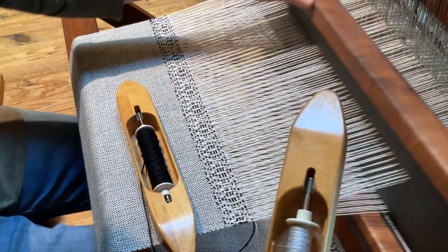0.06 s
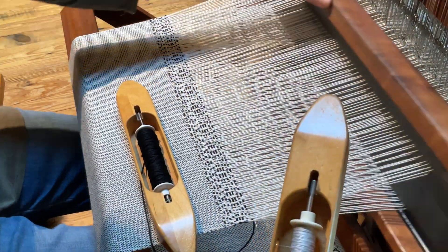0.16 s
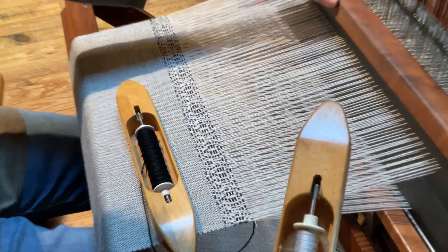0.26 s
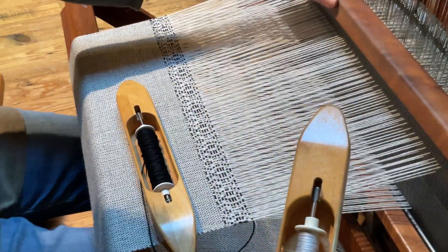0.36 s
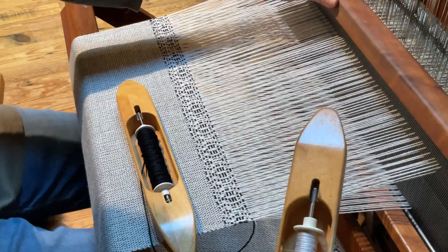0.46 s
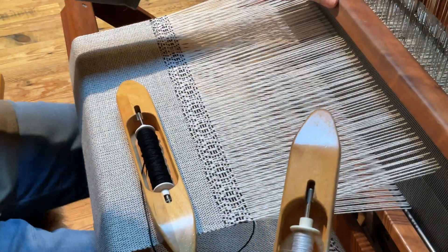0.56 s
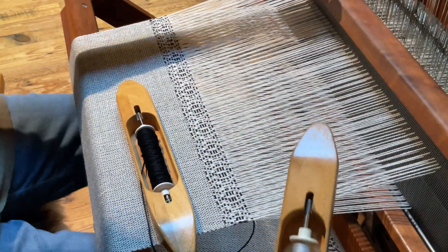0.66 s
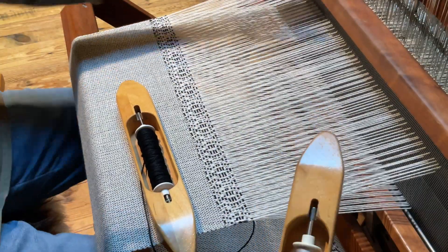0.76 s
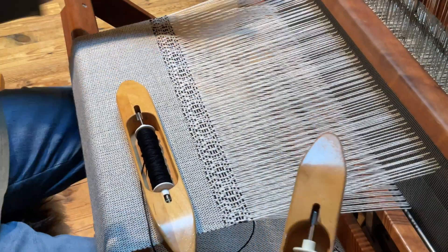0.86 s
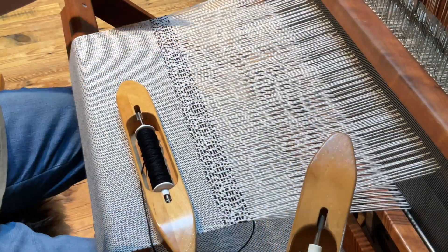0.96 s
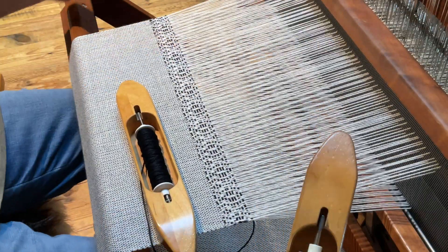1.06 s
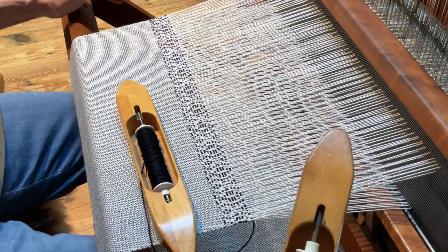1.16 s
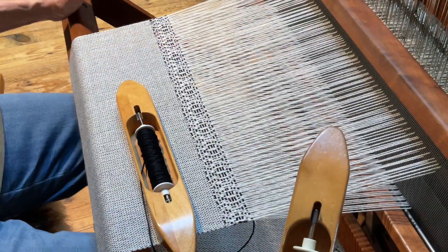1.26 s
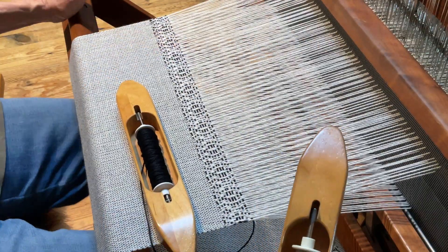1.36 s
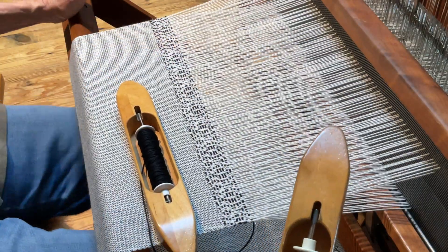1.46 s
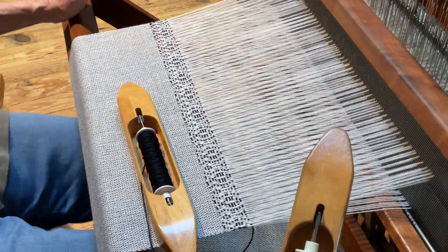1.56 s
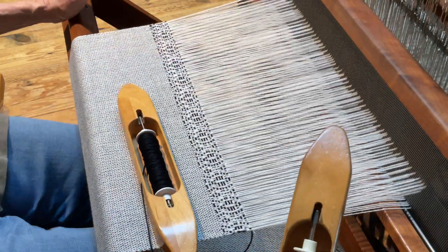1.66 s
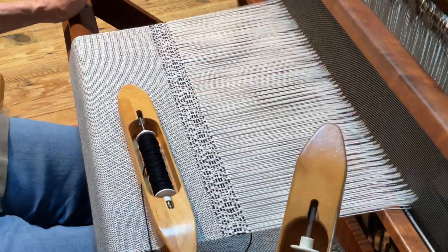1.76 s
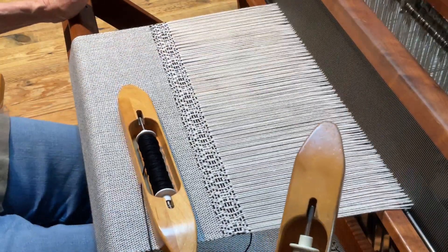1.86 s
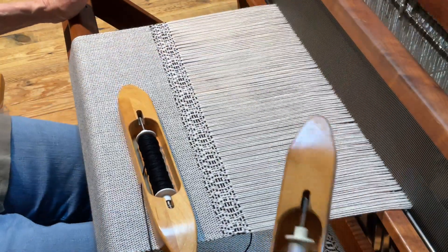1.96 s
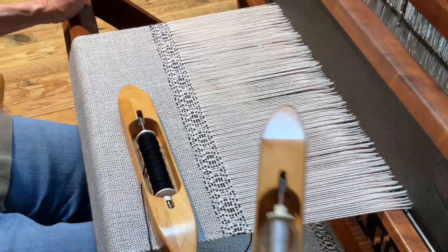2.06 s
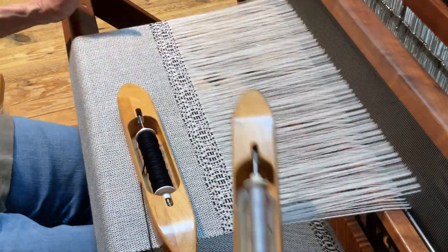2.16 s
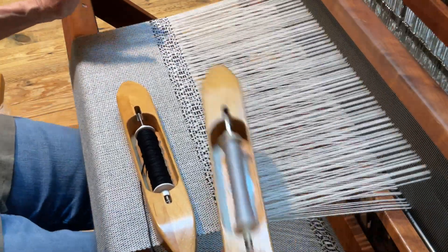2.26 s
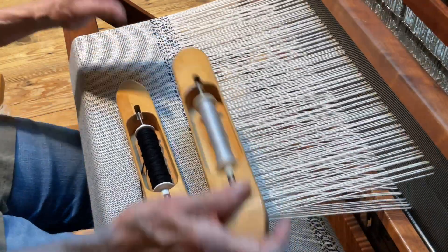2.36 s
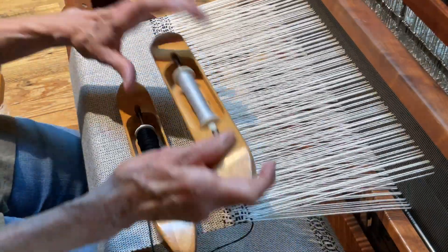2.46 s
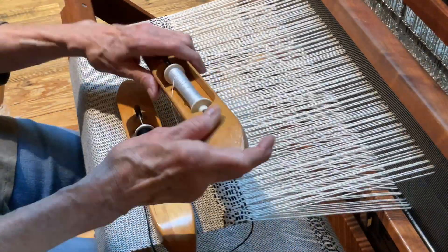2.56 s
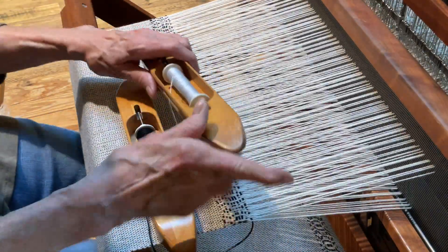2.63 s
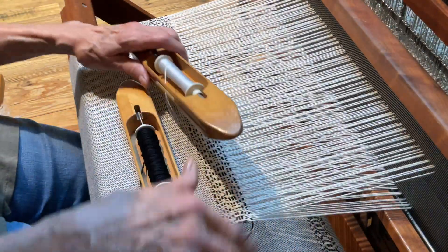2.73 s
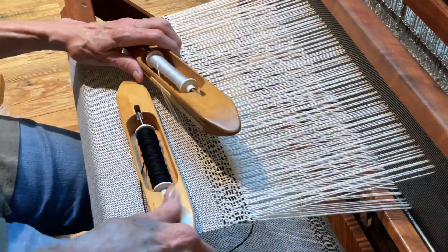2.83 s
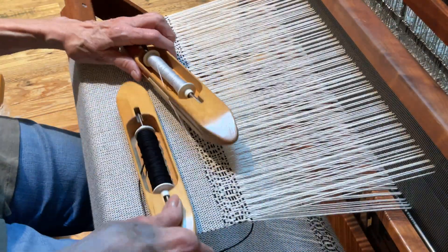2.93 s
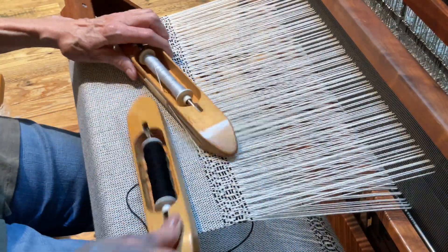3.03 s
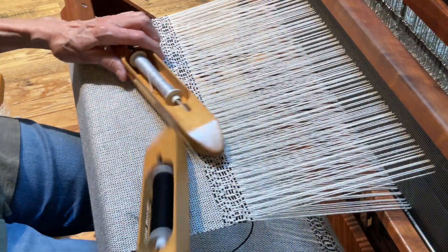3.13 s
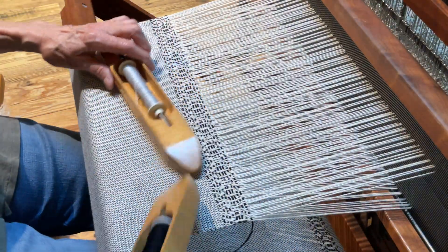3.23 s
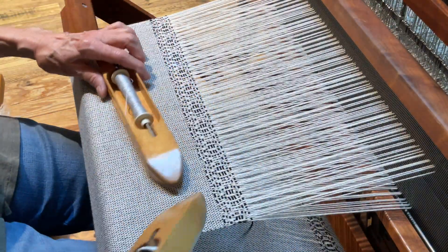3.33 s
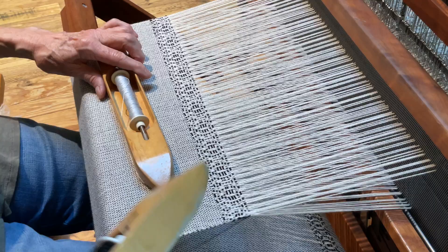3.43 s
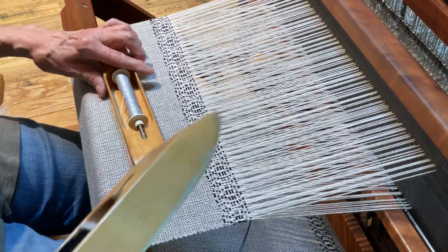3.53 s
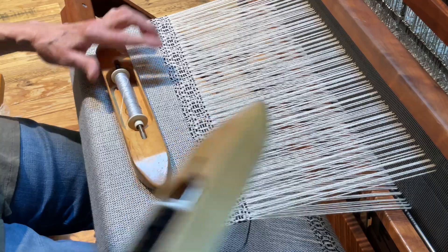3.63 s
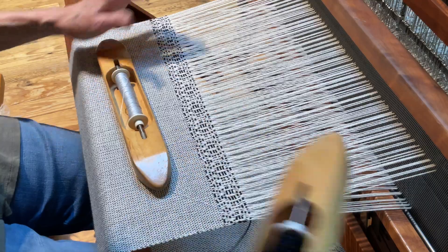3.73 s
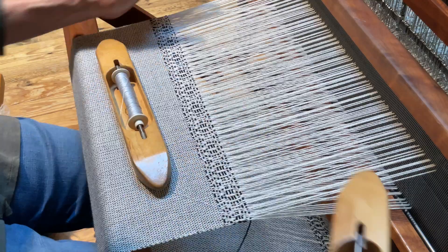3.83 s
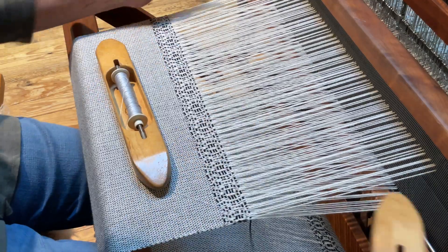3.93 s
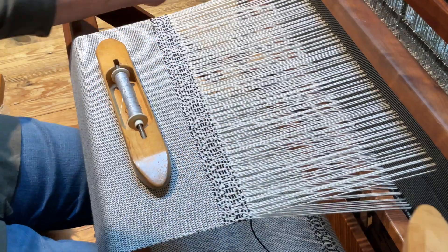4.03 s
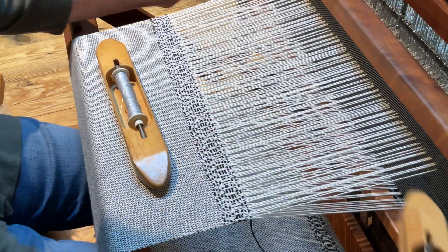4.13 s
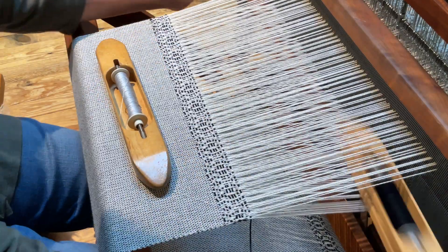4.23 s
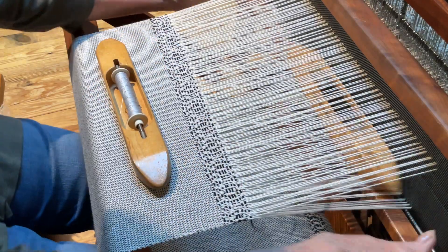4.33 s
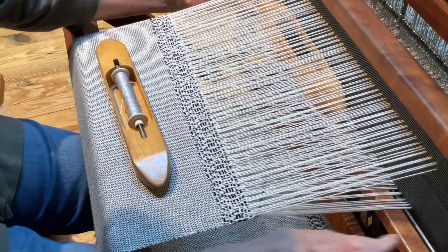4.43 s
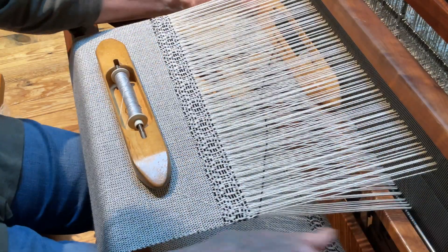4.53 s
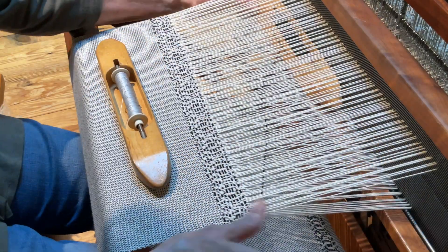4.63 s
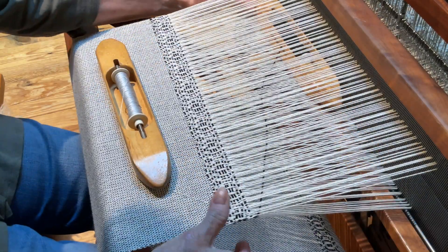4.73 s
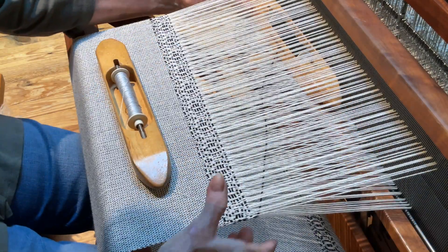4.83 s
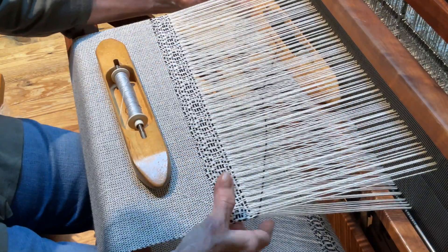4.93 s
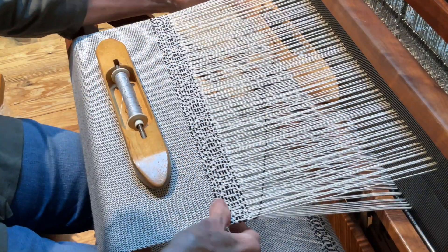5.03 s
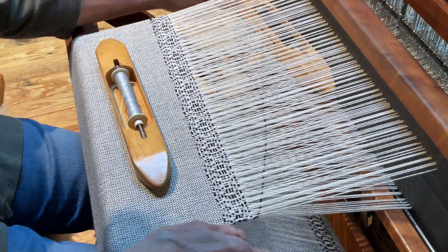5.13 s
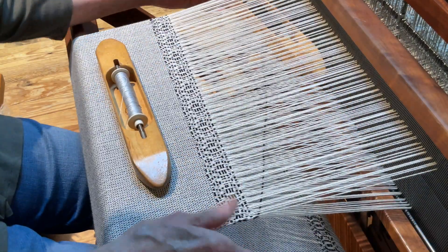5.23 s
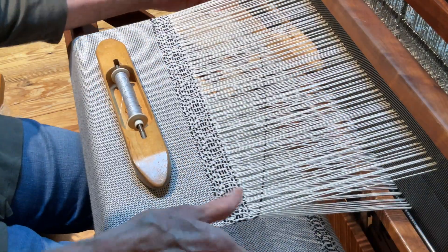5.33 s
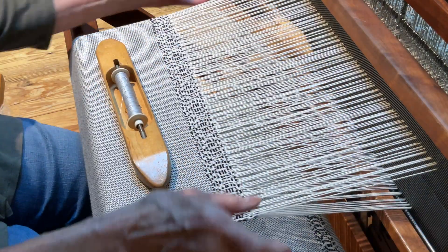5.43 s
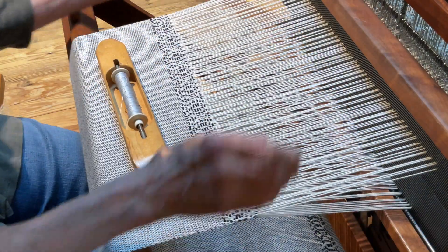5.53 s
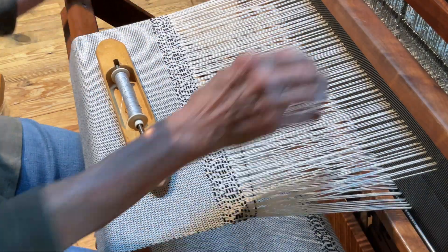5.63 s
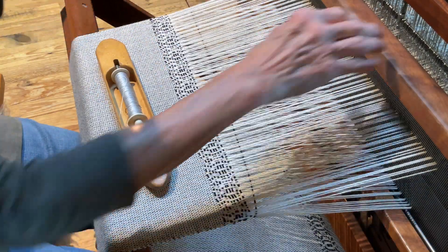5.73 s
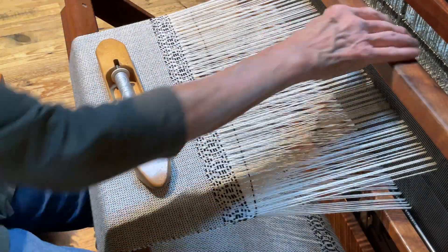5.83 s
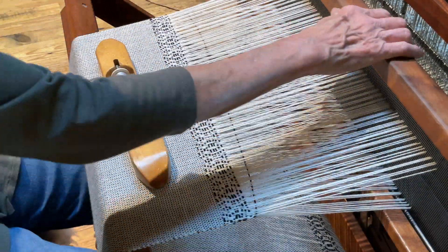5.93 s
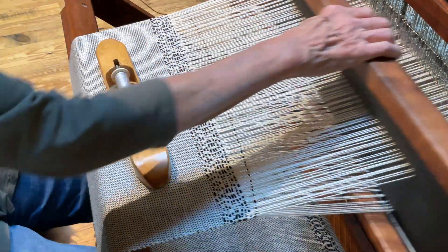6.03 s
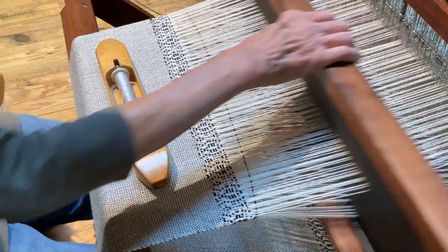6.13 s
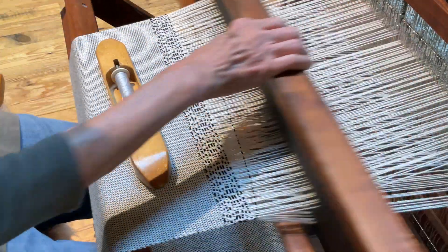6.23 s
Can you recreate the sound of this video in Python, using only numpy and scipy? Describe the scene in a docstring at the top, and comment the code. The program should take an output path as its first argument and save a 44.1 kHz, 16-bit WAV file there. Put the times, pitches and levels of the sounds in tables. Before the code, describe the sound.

Close, dry indoor view of a wooden floor loom. The beater falls back with a rapid woody chatter, then a pause. Dull frame thumps and a rustle of warp threads follow as the shafts shift. A shuttle clacks down crisply, hollow hulls knock and loose bobbins rattle, and at the end a shuttle scrapes along the race with scattered taps. Soft cloth and hand brushes fill the gaps.

```python
"""Weaving on a wooden floor loom in a small room, with soft strokes of hands, cloth and yarn throughout.
First the beater falls back and chatters against the frame, a burst of knocks that ring like wood.
Then the treadles shift the shafts: the frame shudders and the warp rustles, made from grains of noise.
A pale shuttle clacks onto the cloth; hollow hulls knock while loose bobbins rattle on their spindles.
Last, a shuttle is pushed through the shed and scrapes along the race, made from many tiny ringing taps."""
import sys
import numpy as np
from scipy import signal
from scipy.fft import rfft, irfft, next_fast_len
from scipy.io import wavfile
from scipy.ndimage import map_coordinates

SR = 44100
rng = np.random.default_rng(int(sys.argv[2]) if len(sys.argv) > 2 else 0)


def store_wav(level_fs):
    """Save 16-bit WAV to argv[1]."""
    pcm = np.round(np.clip(np.atleast_2d(level_fs), -1, 1) * 32767)
    wavfile.write(sys.argv[1], SR, pcm.T.astype(np.int16))


N = 277389  # length in samples

# The notes a shuttle's hollow hull rings with.
# Each row: frequency in Hz, relative strength in dB, time to fade by 60 dB in seconds.
HULL_MODES = [(1224.6, -8.5, 0.14), (1296, -1, 0.046), (1549, -18.5, 0.21), (2253, -4.5, 0.12),
              (2331, 3, 0.047), (2580, -11, 0.091), (3005, -11.5, 0.073), (3607, -10, 0.076),
              (4124, -11.5, 0.067), (4526, 4.5, 0.023), (5570, -5.5, 0.026), (6480, -7.5, 0.042),
              (8130, -7, 0.014)]
# The colour of the crack when shuttle wood is hit. Each row: frequency in Hz, relative level in dB.
WOOD_CRACK = [(60, -36), (450, -5.5), (800, -27.5), (1200, 5.5), (2500, 6.5), (5000, 5), (9500, -0.5),
              (12000, -10), (15500, -21)]


def loom():
    """The frame knocks, shudders and rubs at its joints while warp threads pluck past the heddles in clumps."""
    # Blows from beater, treadles, shafts and shuttle.
    # Each row: start in seconds, relative level in dB, treble over body in dB.
    frame_knocks = [(0.207, -39.5, -11), (1.216, -57.5, -33), (1.41, -41, -13), (1.492, -34, -13.5),
                    (1.767, -30, -16), (1.816, -32, -14), (1.975, -39.5, -19), (2.125, -26, -13),
                    (2.185, -36.5, 28), (2.293, -35, 6.5), (4.117, -31.5, -0.5), (4.271, -26.5, -7.5),
                    (4.325, -25.5, 12)]
    # The notes of the frame.
    # Each row: frequency in Hz, relative strength in dB, time to fade by 60 dB in seconds.
    frame_modes = [(392.4, -17, 0.13), (601.5, -6.5, 0.057), (1171, -1, 0.028), (1421, -4.5, 0.078),
                   (1572, -4, 0.02), (1663, 5.5, 0.019), (1903, -16, 0.18), (3175, -11, 0.016),
                   (4540, -8, 0.031), (5160, -14.5, 0.16)]
    # The colour of the frame's crack. Each row: frequency in Hz, relative level in dB.
    frame_crack = [(40, -12.5), (90, -5), (250, -4), (600, 1), (1500, 6.5), (5000, -2.5), (7000, -12),
                   (10000, -16.5), (15000, -19.5)]
    # Loads that set the frame shuddering and its joints rubbing.
    # Each row: start in seconds, length in seconds, relative shudder in dB, relative rubbing in dB.
    loads = [(.21, 0.095, -40.5, -56), (0.647, 0.16, -64, -79), (1.22, 0.11, -74, -68.5),
             (1.411, 0.16, -59.5, -50), (1.751, 0.17, -42, -46.5), (2.0, 0.25, -50.5, -49.5),
             (4.115, 0.14, -55.5, -50.5), (4.231, 0.21, -51, -61.5), (4.83, 0.55, -75.5, -79.5),
             (5.31, 0.033, -53, -67), (5.42, 0.34, -71, -70)]
    # Moves of the shafts, which drag the warp through the heddles.
    # Each row: start in seconds, length in seconds, relative level in dB.
    shaft_moves = [(1.47, 0.49, -55), (1.69, 0.087, -35.5), (1.76, 0.1, -34), (1.96, 0.17, -38),
                   (2.25, 0.078, -51.5)]
    # The colours of rubbing joints, heddles and shudder. Each row: frequency in Hz, relative level in dB.
    rub_colour = [(70, -21), (150, -4.5), (400, 6.5), (620, 4), (850, -9), (1300, -16.5), (2200, -13),
                  (3500, -11), (7000, -41.5)]
    heddle_colour = [(700, -9), (1400, -9.5), (2200, -12.5), (2700, -3), (3600, -8.5), (4400, 0),
                     (5500, -0.5), (7000, -5), (9000, -11), (13000, -12.5), (15200, -18), (16000, -32)]
    boom_colour = [(35, -22.5), (48, -10.5), (60, -1), (76, 3), (100, 1.5), (130, 3), (175, -7),
                   (300, -28.5), (600, -74)]

    blows = knocks(beater() + frame_knocks, frame_modes, frame_crack, crack_db=4.5, crack_t60=0.058)

    # the heavy frame is slow to start
    shudder_loads = [(s, length, db) for s, length, db, _ in loads]
    sway = efforts(shudder_loads, rise_s=0.039, fall_db_per_s=118.5)
    shudder = sway * coloured(rng.standard_normal(N), boom_colour)

    catching = amp(2.4 * wobble(rate=68))  # uneven grip, shared by joints and heddles
    rub_loads = [(s, length, db) for s, length, _, db in loads]
    strain = efforts(rub_loads, rise_s=0.005, fall_db_per_s=96)
    rubbing = strain * catching * coloured(grains(rate=990, spread_db=2.0), rub_colour)

    drag = efforts(shaft_moves, rise_s=0.015, fall_db_per_s=154)
    heddles = drag * catching * coloured(grains(rate=2600, spread_db=5), heddle_colour)
    return amp(-0.5) * blows + amp(-2.5) * rubbing + amp(-0.5) * heddles + amp(-4.5) * shudder


def beater(count=7):
    """The beater chatters on the frame at growing gaps, getting thinner, and weaker once its weight settles."""
    start_s, level_db, first_treble_db = 0.2145, -24, -5.5
    first_gap_s, gap_growth = 0.0042, 1.745  # each gap is longer than the last by this factor
    settle_s, fade_db_per_s = 0.04, 143.5
    thinning_db, treble_limit_db = 4, 7.5  # treble gained per contact, and its limit
    k = np.arange(count)
    delay = first_gap_s * (gap_growth ** k - 1) / (gap_growth - 1)
    fade_db = fade_db_per_s * np.maximum(delay - settle_s, 0)
    treble_db = np.minimum(first_treble_db + thinning_db * k, treble_limit_db)
    return list(zip(start_s + delay, level_db - fade_db, treble_db))


def shuttles():
    """Hulls knock and rock, bobbins bounce on their spindles, and the pale shuttle clacks on the cloth."""
    # Knocks on a hull, and clacks of the pale shuttle as it is laid on the cloth.
    # Each row: start in seconds, relative level in dB, treble over body in dB.
    hull_knocks = [(2.847, -34, -8), (3.154, -21, -6.5), (3.167, -25, -19), (3.4969, -20, -11),
                   (3.7435, -29, -14), (4.118, -25.5, -5.5), (4.217, -30, -8), (4.2713, -21, -23.5),
                   (4.4701, -23.5, 0.5), (4.676, -40.5, -4.5), (5.401, -26.5, -8), (5.4555, -23.5, -1.5),
                   (5.537, -24.5, 2.5), (5.597, -26.5, -4), (5.649, -32.5, 8), (5.672, -28, 25),
                   (5.749, -30, 32), (5.842, -27, -26), (5.947, -26.5, -3.5)]
    pale_clacks = [(2.502, -46, -3), (2.5225, -23, 15), (2.5395, -22.5, 8), (2.5595, -37.5, 2),
                   (2.563, -29.5, 19), (2.568, -32, -9)]
    # A jolted bobbin hits its spindle, flies and lands again.
    # Each row: start in seconds, relative level in dB, treble over body in dB, flight in seconds.
    bobbin_jolts = [(.2185, -24.5, 13, 0.0022), (3.433, -40, -4.5, 0.028), (3.487, -28, 8, 0.0029),
                    (3.5025, -17.5, 7.5, 0.0055), (3.5406, -27.5, 1.5, 0.0037), (3.561, -17.5, 10.5, 0.015),
                    (3.605, -21, 2, .028), (3.839, -41, 5.5, 0.0054), (4.2215, -20, 0, .004),
                    (4.277, -14.5, 8, .018), (4.323, -17.5, 3.5, .009), (5.842, -26.5, 9, 0.0027)]
    # The notes of a bobbin and of the pale shuttle.
    # Each row: frequency in Hz, relative strength in dB, time to fade by 60 dB in seconds.
    bobbin_modes = [(1298, -28, 0.21), (2268, 8, 0.01), (2964, -13.5, .035), (3425, -4, 0.028),
                    (4750, -30.5, 0.038), (5740, -1.5, 0.028), (5795, -2.5, 0.022), (7830, -4, 0.024),
                    (9030, -11, 0.064), (9140, 2, 0.021), (9730, -12, 0.008), (11480, -17.5, 0.031),
                    (11450, -15.5, 0.0094), (13420, -3.5, 0.014)]
    pale_modes = [(503, -28, 0.23), (1118, -20, 0.058), (1752, -5.5, 0.065), (1830, 2.5, 0.012),
                  (2156, -2.5, 0.077), (3080, 8, 0.0064), (4000, -11.5, 0.051), (4750, 2.5, 0.023),
                  (5004, -13, 0.016), (5400, -10, .03), (5770, -1.5, 0.022), (6080, -3.5, 0.03),
                  (8440, -3, 0.013)]
    # The colour of the bobbin's crack. Each row: frequency in Hz, relative level in dB.
    bobbin_crack = [(60, -36), (700, -8.5), (1300, 5), (4000, 2.5), (9000, 7), (12500, 2), (14500, -8),
                    (16000, -24)]
    rock_s, rock_loss_db = 0.007, 12.5  # after a knock the hull rocks onto its other end
    landing_loss_db, landing_treble_db = 5, 1  # the landing is weaker, with slightly more treble

    rocks = [(s + rock_s, db - rock_loss_db, treble) for s, db, treble in hull_knocks]
    hull = knocks(hull_knocks + rocks, HULL_MODES, WOOD_CRACK, crack_db=-1.0, crack_t60=0.05)

    jolts = [(s, db, treble) for s, db, treble, _ in bobbin_jolts]
    landings = [(s + flight, db - landing_loss_db, treble + landing_treble_db)
                for s, db, treble, flight in bobbin_jolts]
    bobbin = knocks(jolts + landings, bobbin_modes, bobbin_crack, crack_db=-2.0, crack_t60=0.021)

    pale = knocks(pale_clacks, pale_modes, WOOD_CRACK, crack_db=-7.5, crack_t60=0.039)
    return amp(-3.5) * hull + amp(-1.6) * bobbin + amp(-0.1) * pale


def sliding(count=10):
    """The hull trips over threads and reed wires at several points, each ringing it differently."""
    # Pushes that slide a shuttle along the race, after which it coasts to rest.
    # Each row: start in seconds, length in seconds, relative level in dB.
    pushes = [(4.115, 0.075, -38), (4.44, 0.061, -43.5), (5.33, 0.078, -53.5), (5.4, 0.34, -36),
              (5.86, 0.065, -37.5)]
    scrape = np.zeros(N)
    for _ in range(count):
        weight = amp(4.9 * wobble(rate=55))  # the weight shifts from point to point
        taps = weight * grains(rate=62, spread_db=3.5)
        hull_ring = ring(HULL_MODES, WOOD_CRACK, crack_db=1.5, crack_t60=0.02)
        scrape += signal.fftconvolve(taps, hull_ring)[:N]
    roughness = amp(-25.0 + 8.4 * wobble(rate=190))
    friction = roughness * coloured(grains(rate=520, spread_db=10.0), WOOD_CRACK)
    motion = efforts(pushes, rise_s=0.015, fall_db_per_s=138.5)
    return amp(0.5) * motion * (scrape / rms(scrape) + friction)


def chafing(sharpness=11):
    """Dry wood rubs: quick uneven slips keep one resonance of the wood ringing."""
    # Rubs with a narrow, chattering pitch.
    # Each row: peak time in seconds, half length in seconds, level in dB, pitch in Hz.
    chafes = [(2.81, 0.06, -56.5, 1990), (4.18, 0.033, -30, 2615), (4.219, 0.013, -40, 6940),
              (4.475, 0.061, -41.5, 4620), (5.198, 0.057, -61, 1550), (5.6, 0.16, -40, 2970)]
    slips = amp(3.9 * wobble(rate=90)) * grains(rate=900, spread_db=4.5)
    out = np.zeros(N)
    for s, half, db, centre_hz in chafes:
        tone = signal.lfilter(*signal.iirpeak(centre_hz, sharpness, SR), slips)
        out += amp(db) * stroke(s, half) * tone / rms(tone)
    return out


def handling():
    """Each stroke swells and fades as fibres slip past each other, with an odd thread ticking."""
    # Soft strokes of hands, cloth and unwinding yarn.
    # Each row: peak time in seconds, half length in seconds, level in dB, tilt in dB per octave.
    scuffs = [(0.082, 0.9, -65.5, 1.5), (.6, 0.25, -67, -1.5), (0.882, 0.021, -64.5, 0.5),
              (0.995, 0.024, -79.5, -6), (1.281, 0.049, -58.5, -3.5), (2.808, 0.035, -54.5, 2.5),
              (2.957, 0.078, -61, -1), (3.11, 0.037, -44.5, 1.5), (3.301, 0.061, -55, 1.5),
              (3.454, 0.022, -40.5, -1.5), (3.864, 0.031, -57.5, -1.5), (3.983, 0.099, -62.5, 1.5),
              (5.163, 0.19, -57.5, 1), (6.32, 0.24, -51, 1)]
    # The colour of yarn before tilting. Each row: frequency in Hz, relative level in dB.
    yarn_colour = [(200, -27), (800, -21.5), (1300, -8.5), (2100, -6.5), (3200, -6.5), (4700, 0),
                   (7200, -9), (12500, -15), (16000, -21.5)]
    ticks = amp(-12.5) * grains(rate=55, spread_db=9.5)
    fibres = amp(2.2 * wobble(rate=39)) * (grains(rate=3200, spread_db=2) + ticks)
    out = np.zeros(N)
    for s, half, db, tilt in scuffs:
        tilted = [(hz, level + tilt * np.log2(hz)) for hz, level in yarn_colour]
        out += amp(db) * stroke(s, half) * coloured(fibres, tilted)
    return out


def room(x):
    """The room's diffuse answer is fading noise; its mids linger longest and the high treble dies sooner."""
    # How long the room rings. Each row: frequency in Hz, time to fade by 60 dB in seconds.
    room_t60 = [(100, 0.13), (500, 0.55), (2000, 0.47), (5000, 0.41), (9000, 0.29), (15000, 0.23)]
    hz, t, z = signal.stft(rng.standard_normal(SR), SR, nperseg=256)
    fade = amp(-60 * t / along(room_t60, hz)[:, None])
    tail = signal.istft(z * fade, SR, nperseg=256)[1]
    tail_t = np.arange(len(tail)) / SR
    tail *= 1 - np.exp(-(tail_t / 0.0067) ** 2)  # the first walls are a few metres off
    return signal.fftconvolve(x, tail / np.linalg.norm(tail))[:N]


def quiet_air():
    """The quiet room's own steady hush, made from coloured noise."""
    # The colour of the hush. Each row: frequency in Hz, relative level in dB.
    air_colour = [(30, -11.5), (90, -4.5), (200, -3.5), (900, -22.5), (4500, -17.5), (9000, -29),
                  (16000, -37.5)]
    return amp(-75.5) * coloured(rng.standard_normal(N), air_colour)


def knocks(events, modes, crack, crack_db, crack_t60):
    """Blows on one object; each event sets how much of its attack is treble (harder contacts have more)."""
    out = np.zeros(N + SR)
    attack = SR // 200  # levels are set over the first 5 ms
    low = signal.butter(4, 4000, "low", fs=SR, output="sos")
    high = signal.butter(4, 4000, "high", fs=SR, output="sos")
    for s, db, treble_db in events:
        hit = ring(modes, crack, crack_db, crack_t60)
        body, treble = signal.sosfilt(low, hit), signal.sosfilt(high, hit)
        hit = body / rms(body[:attack]) + amp(treble_db) * treble / rms(treble[:attack])
        out[round(s * SR):][:len(hit)] += amp(db) * hit / rms(hit[:attack])
    return out[:N]


def ring(modes, crack, crack_db, crack_t60, snap_db=7, snap_t60=0.0051):
    """One contact: the modes at new strengths, plus dense upper modes that snap and then die away."""
    t = np.arange(SR // 4) / SR
    hz, db, t60 = np.transpose(modes)[:, :, None]
    size, detune, phase = rng.standard_normal((3, len(modes), 1))
    pitch = hz * (1 + 0.009 * detune)
    tones = amp(db + 2 * size - 60 * t / t60) * np.sin(2 * np.pi * (pitch * t + phase))
    fade = amp(-60 * t / crack_t60) + amp(snap_db - 60 * t / snap_t60)
    burst = amp(crack_db) * fade * coloured(rng.standard_normal(len(t)), crack)
    spread = 1 - np.exp(-(t / 0.001) ** 2)  # the ringing takes a moment to spread through the wood
    return (tones.sum(0) + burst) * spread


def efforts(moves, rise_s, fall_db_per_s):
    """Gain of (start, length, dB) moves: each builds up, holds for its length and dies away."""
    power = np.zeros(N)
    for s, length, db in moves:
        t = np.maximum(np.arange(N) / SR - s, 0)
        level = amp(db - fall_db_per_s * np.maximum(t - length, 0))
        power += (level * (1 - np.exp(-t / rise_s))) ** 2
    return np.sqrt(power)


def stroke(s, half):
    """A smooth swell that peaks at s seconds."""
    return np.exp(-((np.arange(N) / SR - s) / half) ** 2)


def wobble(rate):
    """A smooth random curve, rate knots a second."""
    knots = rng.standard_normal(4096)
    return map_coordinates(knots, [np.arange(N) * rate / SR], mode="wrap")


def grains(rate, spread_db):
    """Tiny random contacts of uneven size, about rate of them a second, at rms 1."""
    happens = rng.random(N) < rate / SR
    sign = rng.choice([-1, 1], N)
    size = amp(spread_db * np.clip(rng.standard_normal(N), -2, 2))
    x = happens * sign * size
    return x / rms(x)


def coloured(x, spectrum):
    """x filtered by the given (Hz, dB) spectrum, at rms 1."""
    y = filtered(x, lambda hz: amp(along(spectrum, hz)))
    return y / rms(y)


def filtered(x, response):
    """x times a response of frequency."""
    m = next_fast_len(len(x) + 8192)  # spare room so the end does not wrap onto the start
    return irfft(rfft(x, m) * response(np.fft.rfftfreq(m, 1 / SR)), m)[:len(x)]


def along(points, hz):
    """(Hz, value) points read on a log frequency axis."""
    f, v = np.transpose(points)
    return np.interp(np.log(hz + 1), np.log(f), v)


def amp(db):
    """Decibels to gain."""
    return 10 ** (np.asarray(db) / 20)


def rms(x):
    """Root mean square, the average strength of x."""
    return np.sqrt(np.mean(x ** 2) + 1e-20)


def scene():
    """The shuttles are close by; the loom's works lie deeper in the room, so they get more of its echo."""
    far = loom()
    near = shuttles() + sliding() + chafing() + handling()
    echo = amp(-8.5) * room(far) + amp(-12.5) * room(near)
    return (far + near + echo + quiet_air())[None]


def record(dry):
    """The microphone rolls off the deep bass, and a steep band limit cuts the highest treble."""
    low_hz, top_hz = 48.7, 15800

    def response(hz):
        bass = hz ** 4 / np.hypot(hz ** 4, low_hz ** 4)
        top = 1 / np.hypot(1, (hz / top_hz) ** 120)
        return bass * top

    return filtered(dry[0], response)[None]


dry = scene()
out = record(dry)
store_wav(out)
```